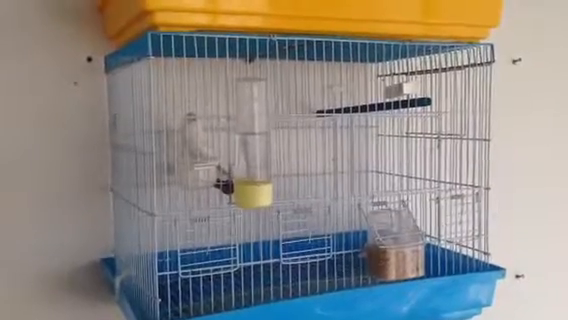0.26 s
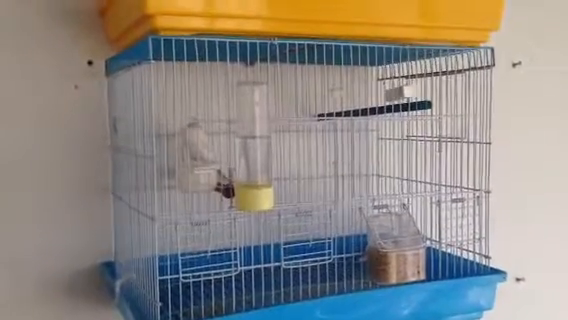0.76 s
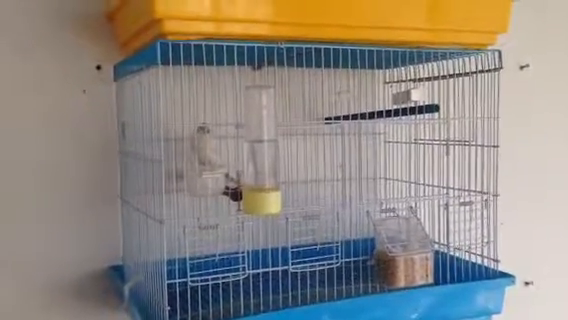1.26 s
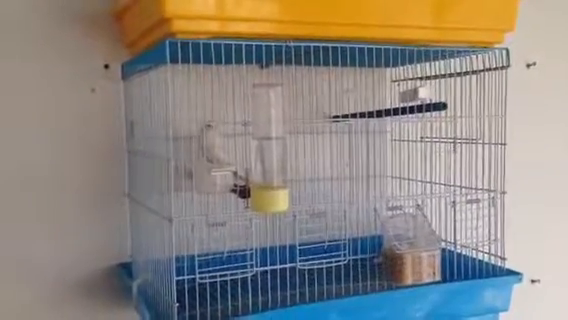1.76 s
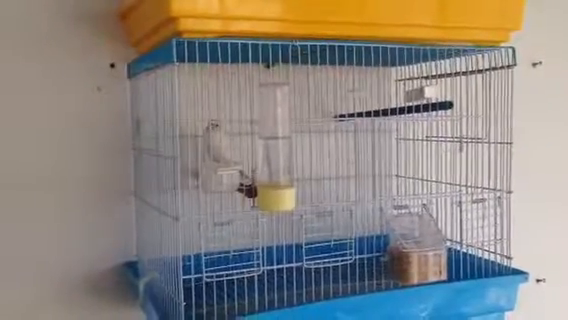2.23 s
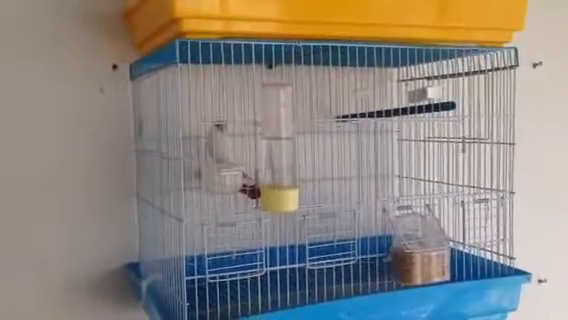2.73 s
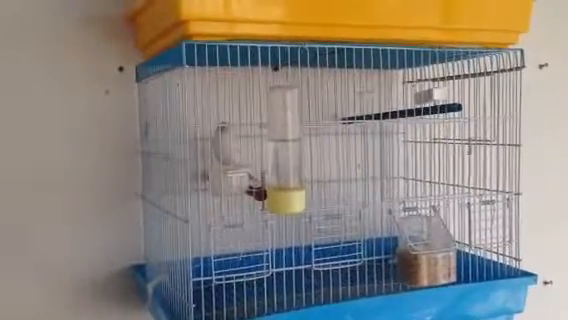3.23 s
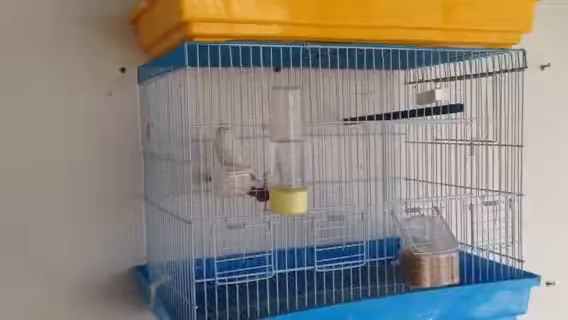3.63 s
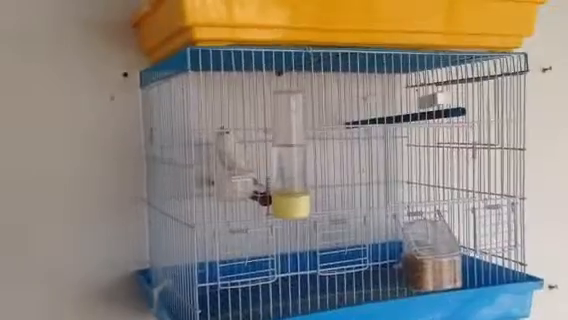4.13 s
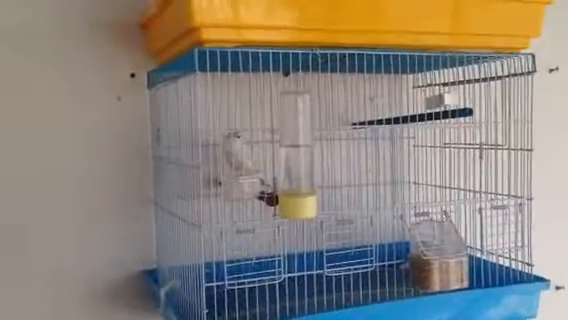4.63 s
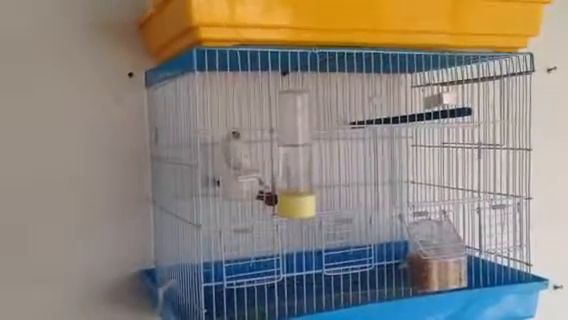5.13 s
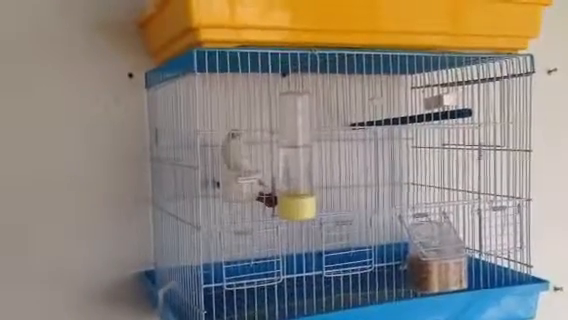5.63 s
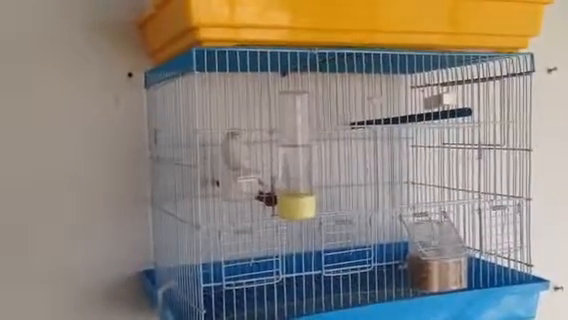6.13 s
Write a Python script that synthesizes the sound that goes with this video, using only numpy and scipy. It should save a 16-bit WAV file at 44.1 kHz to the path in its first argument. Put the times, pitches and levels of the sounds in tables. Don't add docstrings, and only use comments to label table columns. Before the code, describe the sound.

Small-microphone sound of several songbirds in a hard-walled room. One rolls short rising notes, fast, slower, then fast again, while another pipes loudly and evenly with a break and rasp in each note. Others whistle, scold and answer in soft nasal tones. Occasional dull knocks and far bird chatter lie beneath. The rolling and piping stop before five seconds, leaving airy noise, a falling whistle and a rapid closing trill.

```python
import sys
import numpy as np
from scipy import signal
from scipy.io import wavfile
from scipy.ndimage import uniform_filter1d

SR = 44100
rng = np.random.default_rng(int(sys.argv[2]) if len(sys.argv) > 2 else 0)


def store_wav(level_fs):
    pcm = np.round(np.clip(np.atleast_2d(level_fs), -1, 1) * 32767)
    wavfile.write(sys.argv[1], SR, pcm.T.astype(np.int16))


def gain_from_db(level_db):
    decades = np.asarray(level_db, float) / 20
    return 10 ** decades


N = 281358


def evened(x):
    return x / np.sqrt(np.mean(x ** 2) + 1e-20)


def add(mix, s, sound):
    part = mix[round(max(s, 0) * SR):][:len(sound)]
    part += sound[:len(part)]


def drift(n, hz):
    chance = rng.standard_normal(SR + n)
    lowpass = signal.butter(2, hz, fs=SR, output="sos")
    return evened(signal.sosfiltfilt(lowpass, chance)[SR // 2:][:n])


def voice(rows, wobble=0.0025, wobble_hz=58.0, flutter_db=3.0):
    s, hz, db, *overtones = np.transpose(rows)
    t = np.arange(s[0], s[-1], 1 / SR)
    unsteady = drift(SR // 2, wobble_hz)[:len(t)]
    phase = 2 * np.pi * np.cumsum(np.interp(t, s, hz) * (1 + wobble * unsteady)) / SR
    tone = np.sin(phase)
    for k, overtone in enumerate(overtones):
        tone = tone + gain_from_db(np.interp(t, s, overtone)) * np.sin((k + 2) * phase)
    edges = np.clip(np.minimum(t - s[0], s[-1] - t) / 0.0062, 0, 1)
    level = gain_from_db(np.interp(t, s, db) + flutter_db * unsteady[::-1])
    return s[0], np.sqrt(2) * level * tone * edges


def piper():
    # t/s, peak level/dB, f/Hz, length factor, warble depth as a share of f
    pipes = [
        (1.9954, -21, 2840, 0.88, 0.0065),
        (2.436, -21, 2787, 0.73, 0.023),
        (2.8798, -20, 2817, 0.86, 0.017),
        (3.348, -20.5, 2787, 0.81, 0.01),
        (3.8163, -23, 2845, 1.01, 0.0047),
        (4.291, -20.5, 2833, 0.74, 0.0042),
        (4.7828, -21.5, 2852, 0.81, 0.0073),
    ]
    pipe_overtones = [-47, -36.5, -38.5]
    lead_s, break_s, body_s = .042, .013, 0.0924
    warble_hz, rasp_hz, rasp_db, rasp_share = 38, 97, 3, .012
    out = np.zeros(N)
    u = np.arange(0, lead_s + break_s + body_s, .001)
    lead = np.clip(u / lead_s, 0, 1)
    flick = np.clip((u - lead_s) / break_s, 0, 1)
    body = np.clip((u - lead_s - break_s) / body_s, 0, 1)
    flick_depth = np.where(flick < .5, .05, .12)
    factor = 1 + .016 * (1 - lead) ** 2 - flick_depth * np.sin(2 * np.pi * flick) - .01 * body
    swell_db = 20 * np.log10(1 / 20 + np.sin(np.pi / 2 * lead))
    break_db = -6.5 * flick - 17 * np.sin(np.pi * flick)
    catch_db = -11 * np.exp(-((body - 0.55) * body_s / 0.01) ** 2)
    rel = swell_db + break_db + catch_db - 28 * body ** 16
    rel = rel + rasp_db * flick * np.cos(2 * np.pi * rasp_hz * u)
    warble = flick * np.sin(2 * np.pi * warble_hz * (u - lead_s))
    for s, db, hz, stretch, depth in pipes:
        times = s - .008 + u + (np.clip(stretch, .75, 1.1) - 1) * body_s * body
        rasp = rasp_share * flick * drift(len(u), 8000.)
        overtones = np.ones((len(u), 1)) * pipe_overtones
        rows = np.column_stack([times, hz * (factor + depth * warble + rasp), db - 4.5 + rel, overtones])
        add(out, *voice(rows, wobble=0.0014, wobble_hz=50., flutter_db=2.3))
    return out


def roller():
    roll_starts = [0.019, 0.148, .291, 0.437, .58, .726, .866, 1.015, 1.152, 1.313, 1.513, 1.712, 1.915,
                   2.115, 2.318, 2.511, 2.715, 2.92, 3.131, 3.326, 3.524, 3.69, 3.835, 3.974, 4.121, 4.266,
                   4.412, 4.567, 4.712]
    low_hz, top_hz = 1137, 1879.6
    climb_s, attack_s, sag_from_s, accent_s = .095, 0.009, .055, .018
    out = np.zeros(N)
    u = np.array([0, attack_s, sag_from_s, climb_s - .004, climb_s,
                  climb_s + accent_s - .004, climb_s + accent_s])
    hz = low_hz + (top_hz - low_hz) * np.minimum(u / climb_s, 1)
    rel = np.array([-16, -2, 0, -9, 8, 8, -22])
    sag_lift = -np.minimum(rel + 2, 0) * (u > sag_from_s)
    octave = -14 + np.where(u < climb_s, sag_lift, -5)
    for s, (effort, colour) in zip(roll_starts, rng.standard_normal((len(roll_starts), 2))):
        rows = np.column_stack([s + u, hz, -46 + rel + 0.9 * effort, octave + 3 * colour, -32 + 0 * u])
        add(out, *voice(rows, wobble=0.0086, wobble_hz=123.0, flutter_db=2.5))
    return out


def whistler():
    # t/s, length/s, level/dB, harmonic 2/dB, loudest moment as a share
    slides = [
        (.815, .36, -46, 7, .5),
        (6.003, .21, -42.5, -13, .68),
    ]
    # t/s, f/Hz, level/dB
    swoop = [
        (1.188, 2846, -30),
        (1.2, 3000, -31),
        (1.207, 4200, -42),
        (1.213, 4600, -39),
        (1.225, 4200, -29.5),
        (1.24, 3240, -27),
        (1.256, 2596, -31.5),
        (1.275, 2394, -37.5),
        (1.325, 2400, -40),
    ]
    # t/s, length/s, first f/Hz, last f/Hz, level/dB
    held = [
        (.812, .02, 5400, 5250, -43),
        (1.325, .1, 2680, 2770, -37),
        (1.445, .097, 2730, 2750, -28.5),
        (1.545, .055, 2765, 2760, -26.5),
        (1.6, .055, 2765, 2755, -36),
        (2.885, .045, 3775, 3530, -40),
    ]
    whistle_overtones = [-40, -46]
    from_hz, to_hz, settle_s = 2780, 1795, .038
    out, u, calls = np.zeros(N), np.linspace(0, 1, num=30), []
    for s, length, db, second_db, top in slides:
        hz = to_hz + (from_hz - to_hz) * np.exp(-length * u / settle_s)
        rel = -17 * np.where(u < top, (top - u) / top, ((u - top) / (1 - top)) ** 2)
        calls.append([(s + length * v, f, db + r, second_db, -32) for v, f, r in zip(u, hz, rel)])
    swoop_rows = [(*row, *whistle_overtones) for row in swoop]
    add(out, *voice(swoop_rows, wobble=.019, wobble_hz=220., flutter_db=3.5))
    for s, length, first_hz, last_hz, db in held:
        calls.append([(s + length * v, first_hz + (last_hz - first_hz) * v, db + rel, *whistle_overtones)
                      for v, rel in [(0, -7), (.45, 0), (1, -9)]])
    for rows in calls:
        add(out, *voice(rows, wobble=0.004, wobble_hz=50., flutter_db=2.2))
    return out


def answerer():
    # t/s, length/s, top f/Hz, level/dB, harmonic 2/dB
    nasals = [
        (1.148, 0.32, 1056, -58, 2),
        (1.605, 0.22, 1148, -49, -4),
        (2.057, .24, 1141, -51.5, 1),
        (2.484, 0.26, 1164, -51.5, 0.5),
        (2.934, 0.23, 1152, -50, -2),
        (3.405, 0.23, 1131, -50.5, -2.5),
        (3.867, .25, 1163, -52.5, 2),
        (4.353, 0.24, 1147, -49.5, -1.5),
        (3.551, .47, 2036, -53.5, 0),
    ]
    # t/s, length/s, top f/Hz, level/dB, arch share
    drawls = [
        (4.848, .32, 1192, -45.5, .07),
        (5.23, 0.25, 1105, -49.5, 0.0205),
    ]
    arch_per_s, third_db = 0.22, -16
    out, u = np.zeros(N), np.linspace(0, 1, num=21)
    arch = np.sin(np.pi * u ** 0.818)
    for s, length, hz, db, second_db in nasals:
        rows = [(s + length * v, hz * (1 - arch_per_s * length * (1 - a)), db - 14 * (1 - a) ** 3,
                 second_db - 5 * (1 - a), third_db, third_db - 9.5) for v, a in zip(u, arch)]
        add(out, *voice(rows, wobble=0.00081))
    late_arch = np.sin(np.pi * u ** 1.4)
    for s, length, hz, db, share in drawls:
        rows = [(s + length * v, hz * (1 - share * (1 - a)), db - 19 * v - 6 * (1 - a) ** 3,
                 -5.5 + 21.5 * v, -11 + 8 * v, -30 + 19 * v) for v, a in zip(u, late_arch)]
        add(out, *voice(rows, wobble=0.0045, flutter_db=3.5))
    return out


def scolders():
    # t/s, length/s, f/Hz, level/dB
    scolds = [(0.016, .038, 2500, -51.5), (0.281, 0.033, 2373, -49.5), (0.4, .035, 2720, -54),
              (1.3, .054, 2704, -52.5), (1.404, 0.04, 2700, -54), (1.514, 0.038, 2463, -50),
              (1.624, 0.044, 2625, -48), (1.769, 0.052, 2500, -50), (2.884, 0.03, 3450, -47.5),
              (3.262, 0.0153, 3050, -55), (3.563, 0.059, 3295, -49), (3.78, .063, 3220, -49),
              (3.945, 0.028, 3110, -45.5), (4.398, 0.036, 3330, -47), (5.11, 0.035, 3400, -65),
              (6.139, 0.07, 2175, -54.5), (6.266, .045, 1895, -52)]
    # f/Hz, level/dB
    beak_response = [(1850, -14), (2500, -1.5), (3300, -1.5), (4300, 0), (5300, 0), (6600, -12),
                     (7800, -17), (10000, -13)]
    out, (beak_hz, beak_db) = np.zeros(N), np.transpose(beak_response)
    beak = signal.butter(2, [3500, 11000], "bandpass", fs=SR, output="sos")
    for s, length, hz, db in scolds:
        first, *overtones = np.interp(np.log(hz * np.arange(1, 5)), np.log(beak_hz), beak_db)
        rows = [(s + length * v, hz * f, db + first + rel, *(np.array(overtones) - first))
                for v, f, rel in [(0, 1.02, -7), (.3, 1.02, 0), (.7, .99, 1), (1.1, .9, -26)]]
        add(out, *voice(rows, wobble=0.096, wobble_hz=250., flutter_db=6.0))
        hiss = evened(signal.sosfilt(beak, rng.standard_normal(SR // 8)))[:round(length * SR)]
        add(out, s, gain_from_db(db - 11) * hiss * np.hanning(len(hiss)))
    return out


def triller():
    # first pip t/s, last pip t/s, f/Hz, first level/dB, last level/dB
    strands = [
        (5.612, 5.96, 1920, -60, -56),
        (5.661, 5.978, 2390, -64, -50),
        (6.0, 6.359, 2440, -37.5, -40.5),
    ]
    gap_s, pip_s, flick = .0492, 0.01, 0.027
    out = np.zeros(N)
    for first, last, hz, first_db, last_db in strands:
        for s in np.arange(first, last, gap_s):
            db = np.interp(s, [first, last], [first_db, last_db]) + 2 * rng.standard_normal()
            f = hz * (1 + 0.011 * rng.standard_normal())
            rows = [(s - pip_s / 2, (1 - flick) * f, db - 7, -28), (s, f, db, -28),
                    (s + pip_s / 2, f, db - 19, -28)]
            add(out, *voice(rows))
    return out


def knocks():
    # t/s, level/dB, f/Hz, decay time t60/s, click/dB
    impacts = [
        (.38, -44, 480, 0.13, -18),
        (1.79, -43.5, 481, 0.13, -16),
        (3.314, -32, 457, 0.023, -31),
        (4.23, -42.5, 450, 0.065, -11),
        (5.522, -47.5, 600, 0.12, -16),
        (5.565, -47.5, 250, 0.34, -27),
        (0.098, -43, 208, 0.089, -20),
    ]
    out, t = np.zeros(N), np.arange(SR // 3) / SR
    for s, db, hz, t60, click_db in impacts:
        ring = gain_from_db(-60 * t / t60) * np.sin(2 * np.pi * hz * t) * np.minimum(t / 0.0033, 1)
        click = gain_from_db(click_db - 60 * t / t60) * uniform_filter1d(rng.standard_normal(len(t)), size=4)
        add(out, s, gain_from_db(db) * (ring + click))
    return out


def room(x):
    # f/Hz, t60/s
    decay = [(500, 0.15), (1500, 0.35), (3000, 0.3), (6000, 0.26), (12000, 0.021)]
    out, (decay_hz, decay_s) = np.zeros(N), np.transpose(decay)
    for k in range(3):
        taps = np.zeros(SR * 3 // 4)
        at = np.arange(180, len(taps) - 20, 20)
        taps[at + rng.integers(0, 20, len(at))] = rng.choice([-1., 1.], len(at))
        hz, t, z = signal.stft(taps, SR, nperseg=256)
        t60 = np.clip(np.interp(np.log(hz + 1), np.log(decay_hz), decay_s), .05, 2)[:, None]
        tail = signal.istft(z * gain_from_db(-60 * t / t60), SR, nperseg=256)[1]
        share = np.sqrt(2 / 3) * np.cos(np.pi * (np.arange(N) / SR * .7 + k / 3))
        out += signal.fftconvolve(x * share, tail / np.linalg.norm(tail))[:N]
    return out


def noise(spectrum, patchy_db):
    hz = np.fft.rfftfreq(1024, 1 / SR)
    a, b, patches = rng.standard_normal((N // 256 + 5, 513, 3)).T
    patches = evened(uniform_filter1d(uniform_filter1d(patches, 10, 0), 14, 1))
    f, db = np.transpose(spectrum)
    colour = np.interp(np.log(hz + 1), np.log(f + 1), db)[:, None]
    z = (a + 1j * b) * gain_from_db(colour + patchy_db * patches)
    return evened(signal.istft(z, nperseg=1024, noverlap=768)[1][:N])


def swells(rows, quiet_db, rise_db_per_s):
    t = np.arange(N) / SR
    peaks = [db - np.where(t < s, rise_db_per_s * (s - t), abs(fall) * (t - s)) for s, db, fall in rows]
    return np.sqrt(gain_from_db(2 * quiet_db) + sum(gain_from_db(2 * peak) for peak in peaks))


def late_rush():
    # f/Hz, density/dB per Hz
    rush_spectrum = [(150, -22), (500, -8), (900, 7), (1500, 4.5), (2000, 12.5), (2400, 11.5), (3000, 0),
                     (4000, -36), (6000, -68)]
    # t/s, peak level/dB, fall/dB per s
    rush_swells = [
        (5.53, -51, 1.3),
        (6.1, -45, 62),
    ]
    return swells(rush_swells, -81, rise_db_per_s=300) * noise(rush_spectrum, patchy_db=2.5)


def far_chatter():
    # f/Hz, density/dB per Hz
    chatter_spectrum = [(250, -5.5), (500, -3), (800, 4.5), (1100, -2), (1600, -5), (2200, -6),
                        (2700, -9.5), (3400, -11), (4300, -21.5), (7000, -36)]
    # t/s, peak level/dB, fall/dB per s
    chatter_swells = [
        (.01, -53.5, 32),
        (.38, -51.5, 35),
        (.74, -48.5, 33),
        (1.85, -55, 25),
        (3.1, -59.5, 21),
        (3.48, -70, 35),
        (4.94, -53, 26),
        (5.53, -48, 34),
        (6.17, -53.5, 87),
    ]
    return swells(chatter_swells, -66.5, rise_db_per_s=300) * noise(chatter_spectrum, patchy_db=4)


def motor_hum():
    # t/s, peak level/dB, fall/dB per s
    surges = [
        (.35, -57, 8.8),
        (1.94, -67, 11),
        (4.96, -64, 1.5),
    ]
    phase = 2 * np.pi * np.cumsum(76 * (1 + 0.0193 * drift(N, 2.98))) / SR
    hum = swells(surges, -88, rise_db_per_s=38) * np.sin(phase)
    octave = gain_from_db(-69.5 + 2.4 * drift(N, 2.3)) * np.sin(2 * phase)
    return np.sqrt(2) * (hum + octave)


def electric_whine():
    t = np.arange(N) / SR
    return np.sqrt(2) * gain_from_db(-71 + 2.7 * drift(N, 6.)) * np.sin(2 * np.pi * 15000 * t)


def room_air():
    # f/Hz, density/dB per Hz
    air_spectrum = [(36, -20), (50, 10.5), (85, -7), (120, 8.5), (160, -27.5), (200, -4), (330, -16),
                    (520, -3), (900, -9), (1500, -16), (2600, -11.5), (4000, -16.5), (7000, -23),
                    (10000, -21.5), (14500, -16.5), (15300, -12.5)]
    return gain_from_db(-52.5) * gain_from_db(.7 * drift(N, 3.3)) * noise(air_spectrum, patchy_db=1.5)


def scene():
    near, side, bumps = piper(), whistler(), knocks()
    mid = roller() + triller()
    far = answerer() + scolders()
    direct = gain_from_db(1) * near + gain_from_db(-1) * side + gain_from_db(-1) * mid + gain_from_db(-4) * far + bumps
    wet = gain_from_db(-7.5) * near + gain_from_db(-5) * side + gain_from_db(-5) * mid + gain_from_db(-3.5) * far + gain_from_db(-3) * bumps
    background = late_rush() + far_chatter() + motor_hum() + electric_whine() + room_air()
    return (direct + room(wet) + background)[None]


def drop_masked(x, under_db=32.0, slope_db=3.5):
    z = signal.stft(x, nperseg=1376, noverlap=1032)[2]
    bands = z[:688].reshape(86, 8, -1)
    level = 10 * np.log10((abs(bands) ** 2).mean(1) + 1e-20)
    fall = slope_db * np.arange(len(level))[:, None]
    masked = np.maximum.accumulate(level + fall, axis=0) - fall - under_db
    keep = gain_from_db(-30 / (1 + np.exp(np.clip(level - masked, -30, 30))))
    gain = np.vstack([np.repeat(keep, 8, axis=0), keep[-1:]])
    return signal.istft(z * gain, nperseg=1376, noverlap=1032)[1][:N]


def top_cut(x):
    return signal.sosfilt(signal.butter(12, 16620, fs=SR, output="sos"), x)


def record(dry):
    bass_cut = signal.butter(4, 44, "highpass", fs=SR, output="sos")
    band_limit = signal.firwin(1023, 15390, window=("kaiser", 9), fs=SR)
    heard = drop_masked(signal.sosfilt(bass_cut, dry[0]))
    mix = signal.oaconvolve(heard, band_limit, "same")[None]
    return top_cut(mix)


dry = scene()
out = record(dry)
store_wav(out)
```